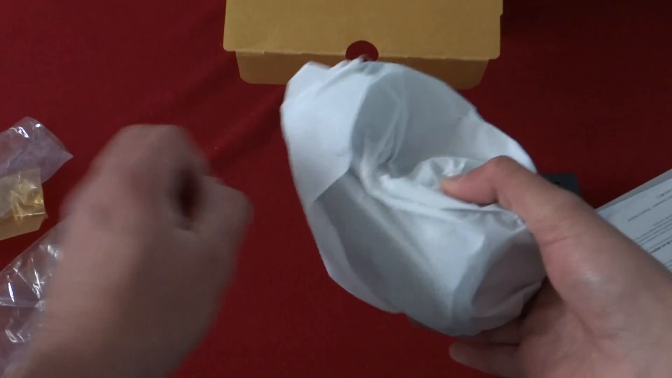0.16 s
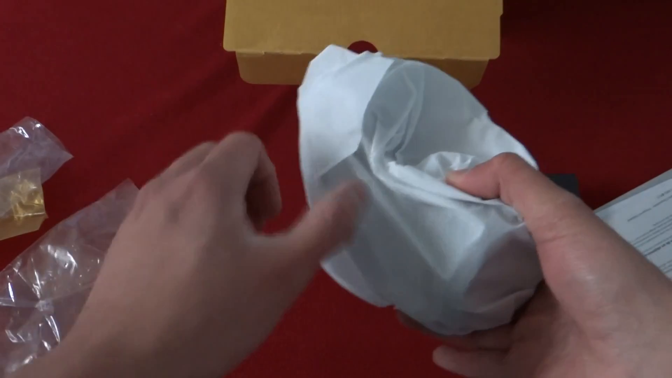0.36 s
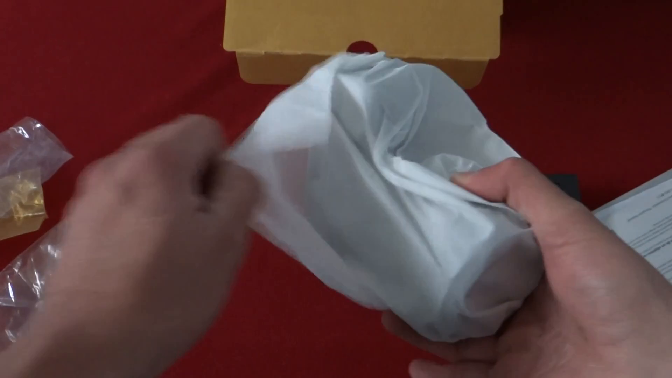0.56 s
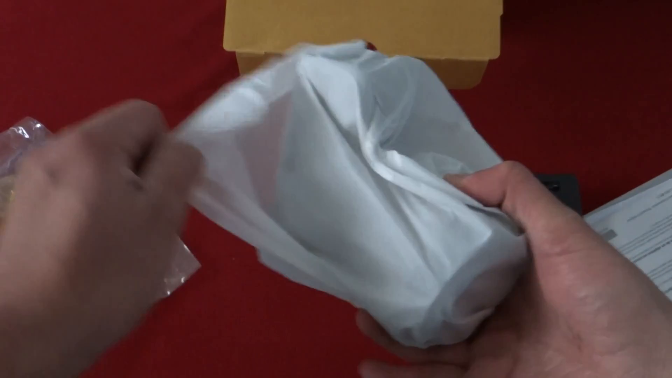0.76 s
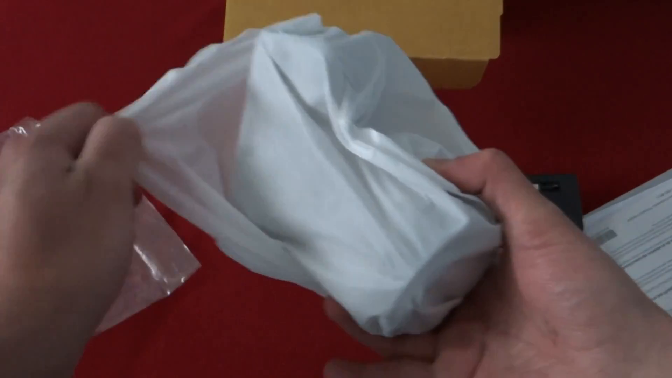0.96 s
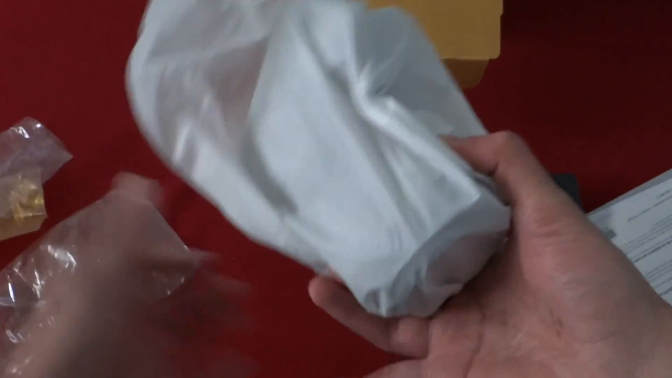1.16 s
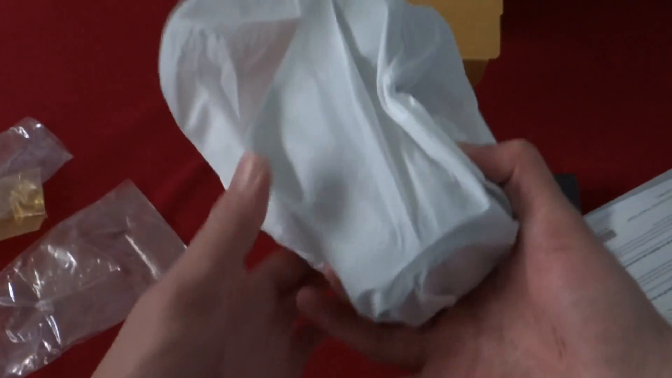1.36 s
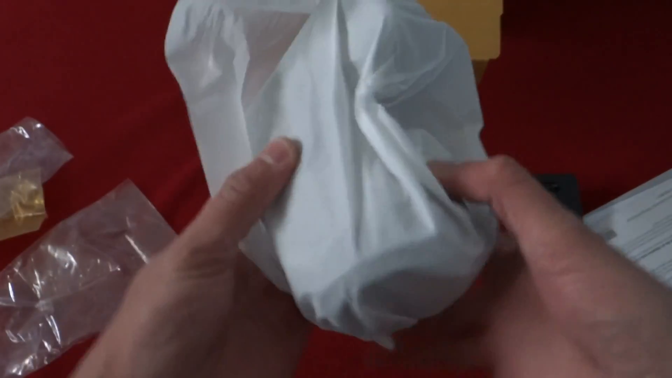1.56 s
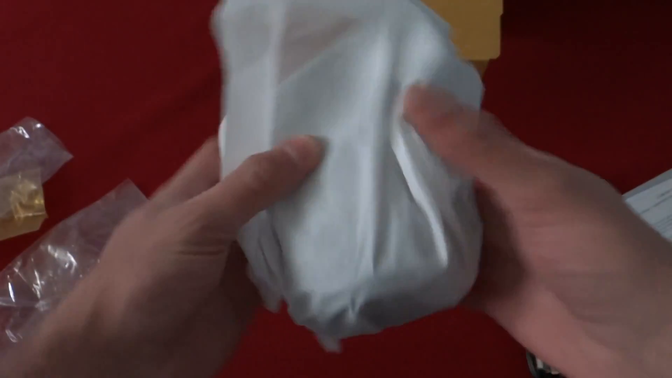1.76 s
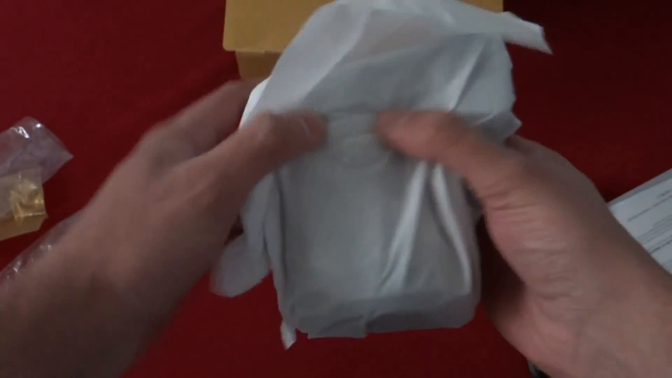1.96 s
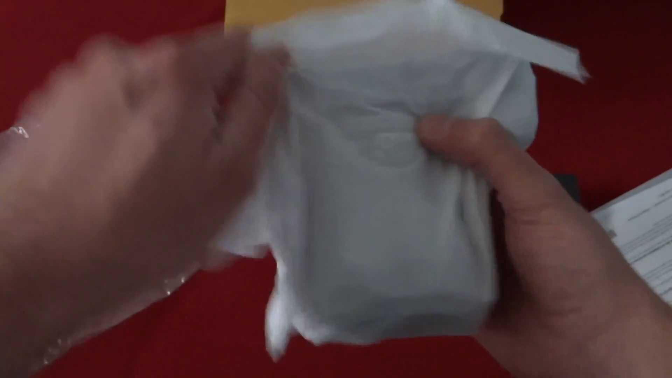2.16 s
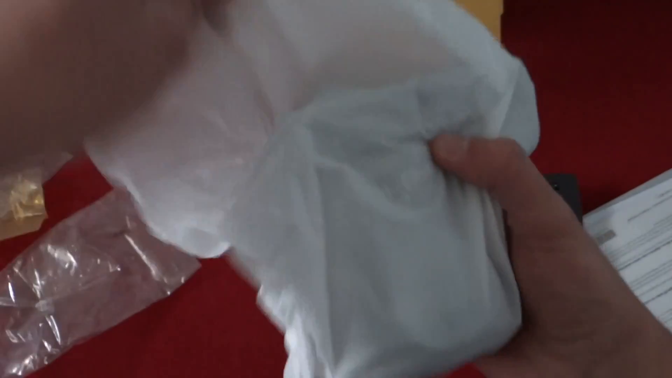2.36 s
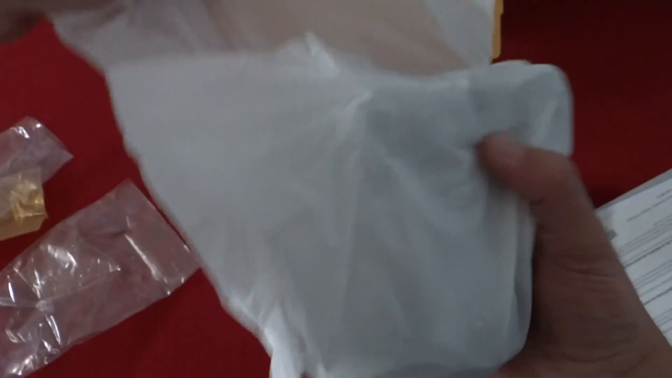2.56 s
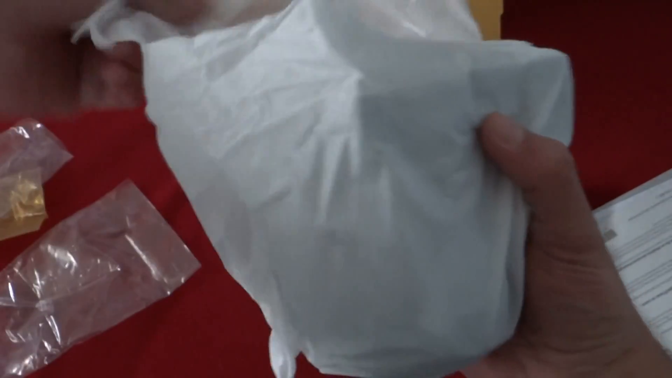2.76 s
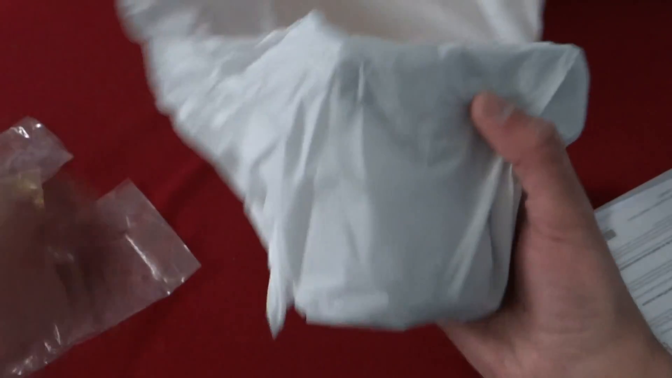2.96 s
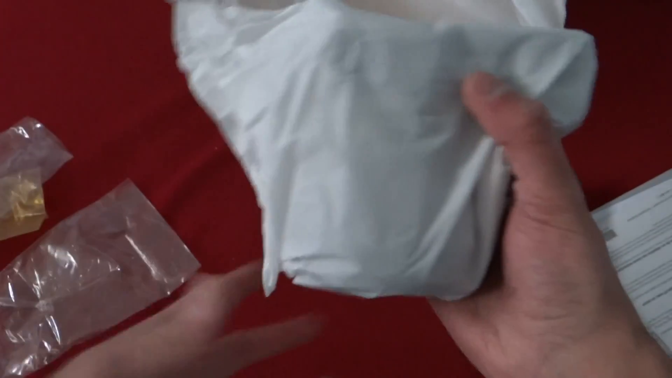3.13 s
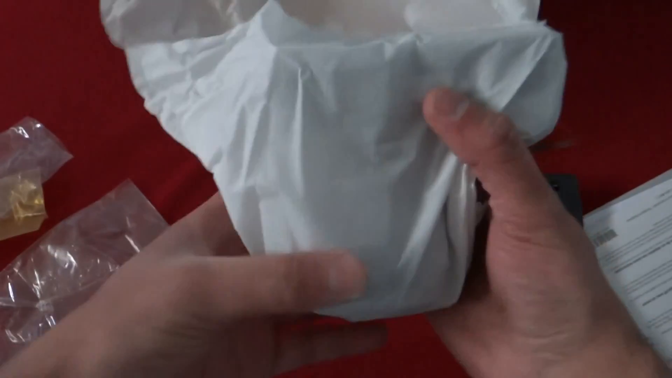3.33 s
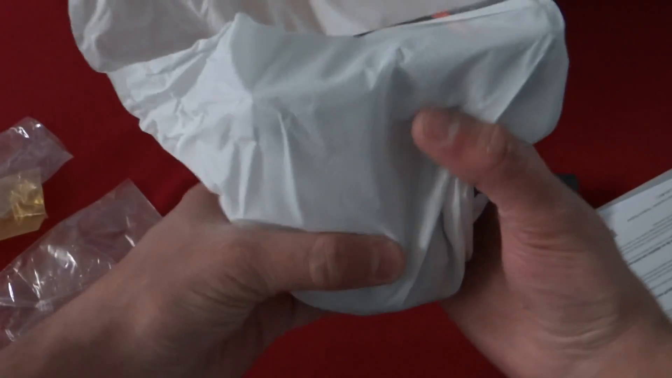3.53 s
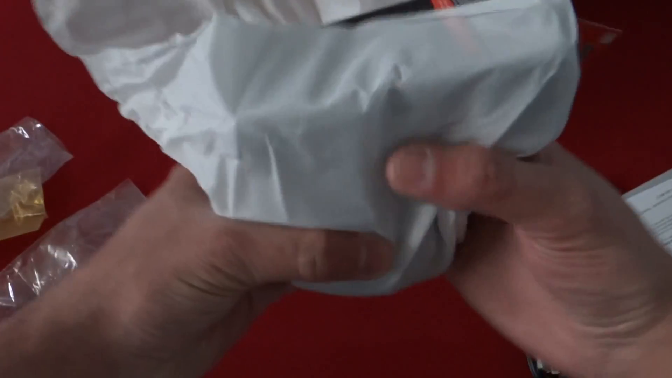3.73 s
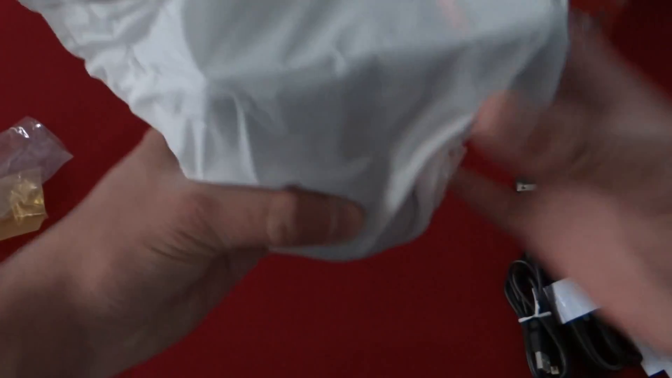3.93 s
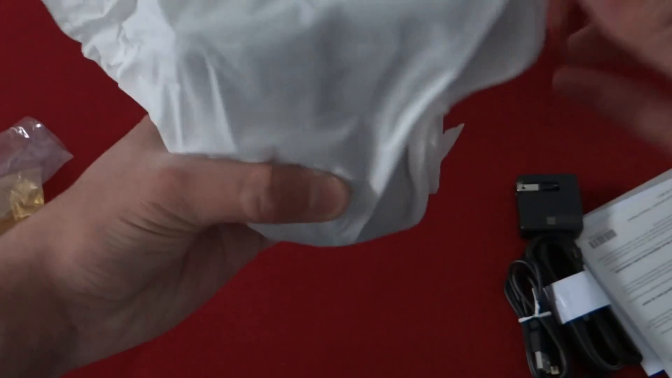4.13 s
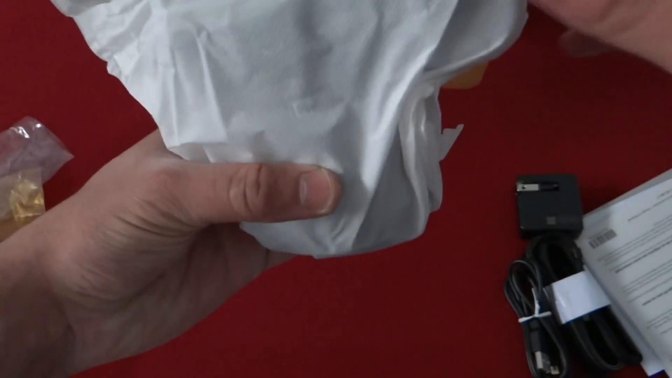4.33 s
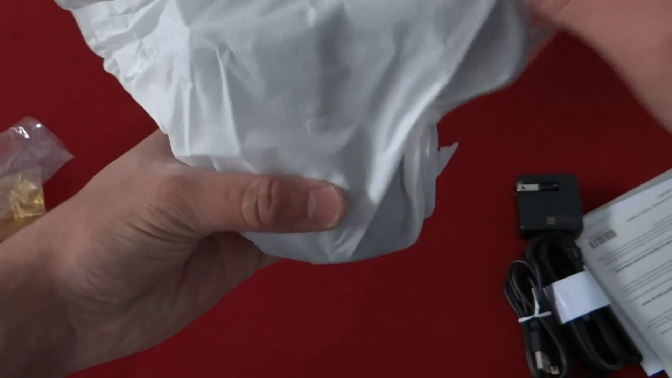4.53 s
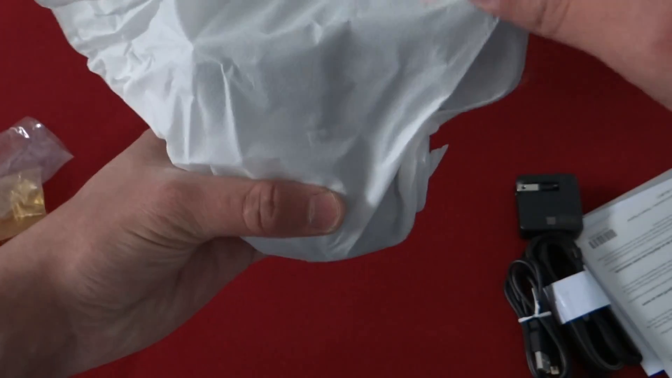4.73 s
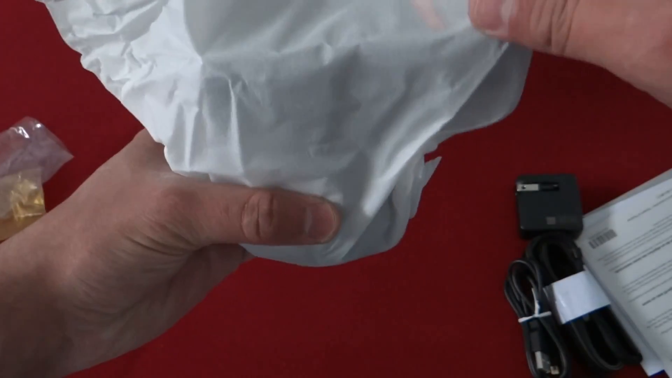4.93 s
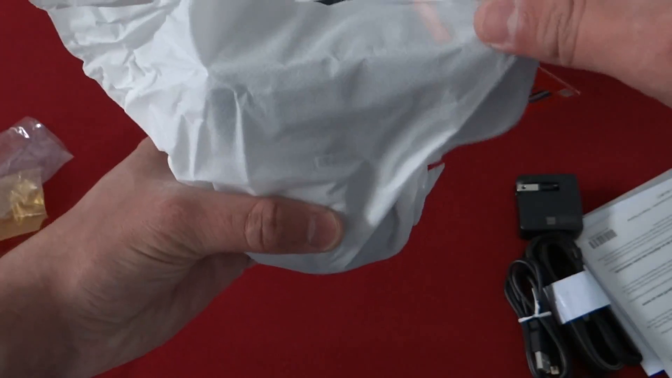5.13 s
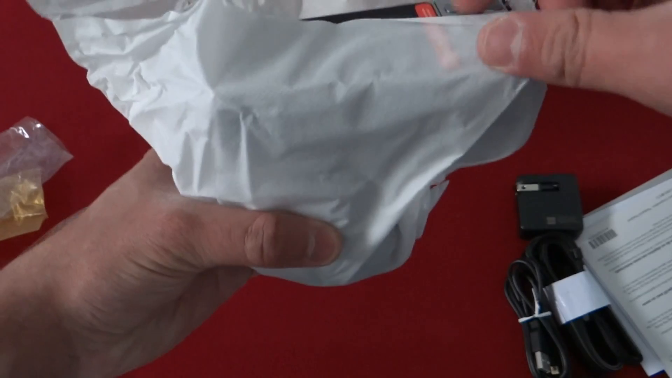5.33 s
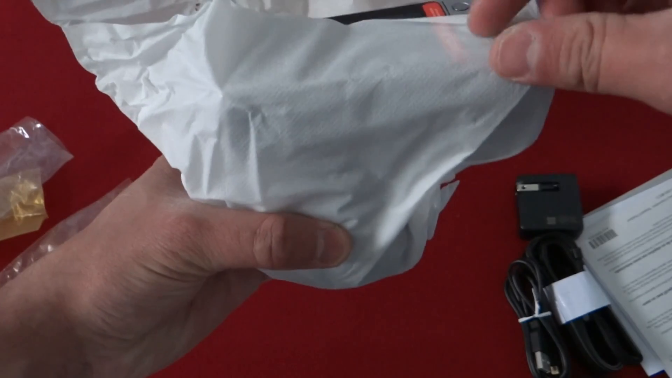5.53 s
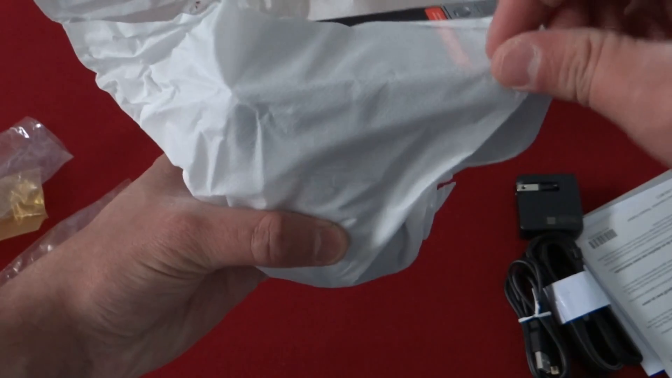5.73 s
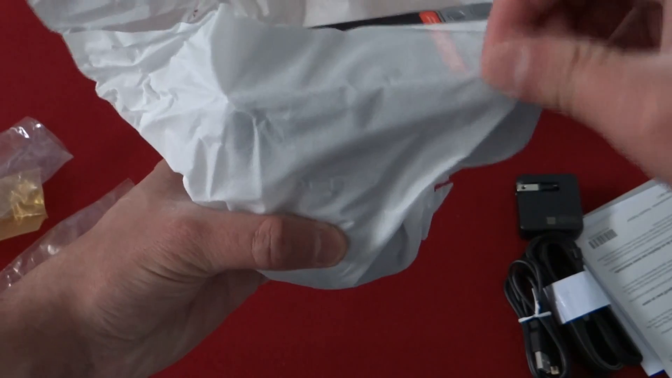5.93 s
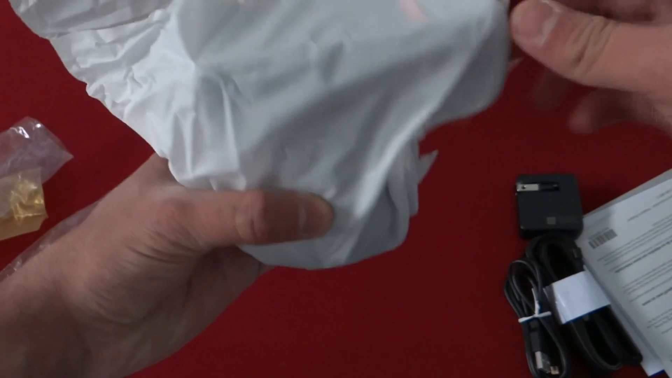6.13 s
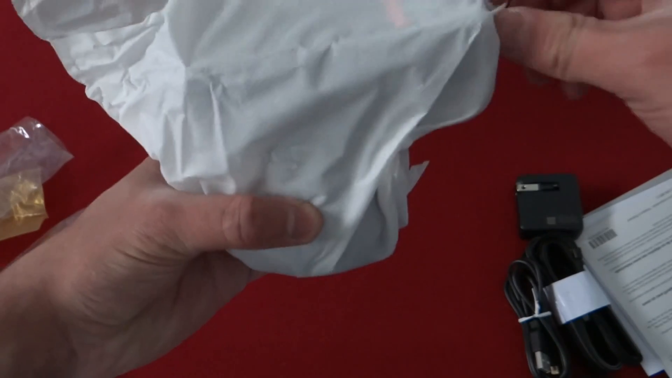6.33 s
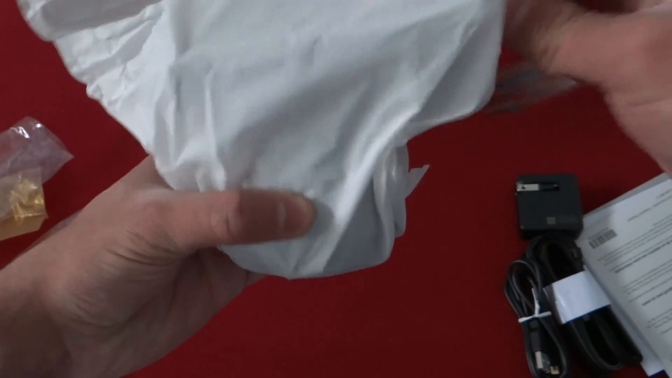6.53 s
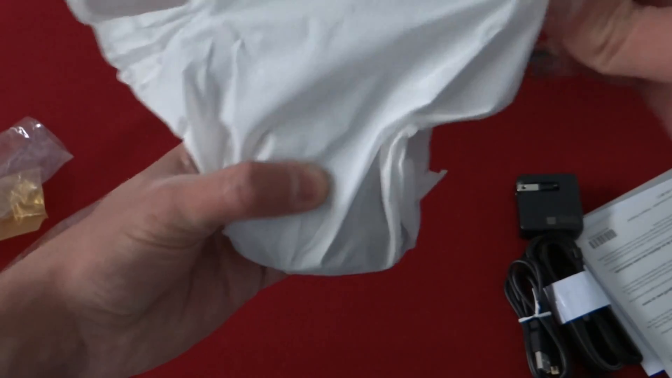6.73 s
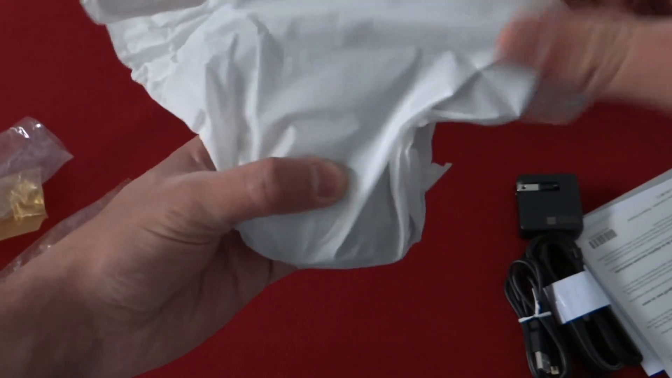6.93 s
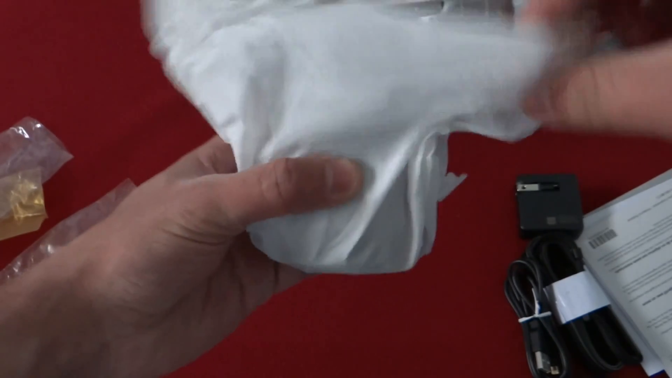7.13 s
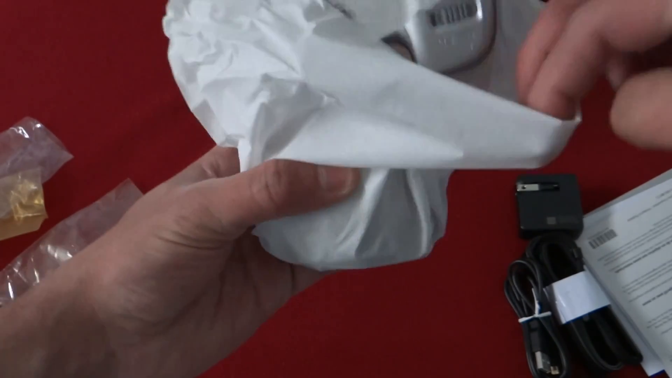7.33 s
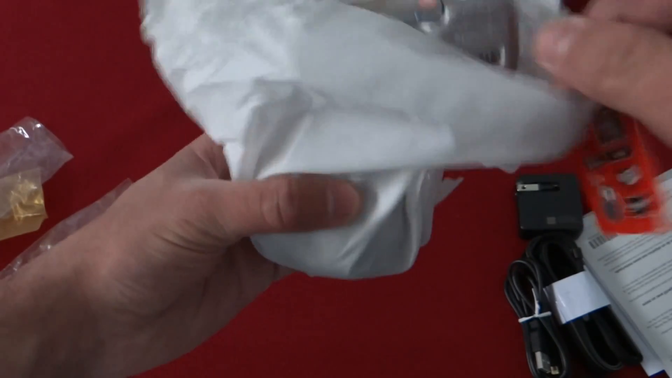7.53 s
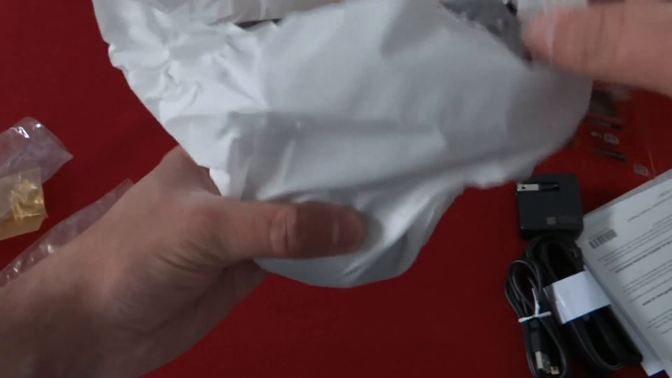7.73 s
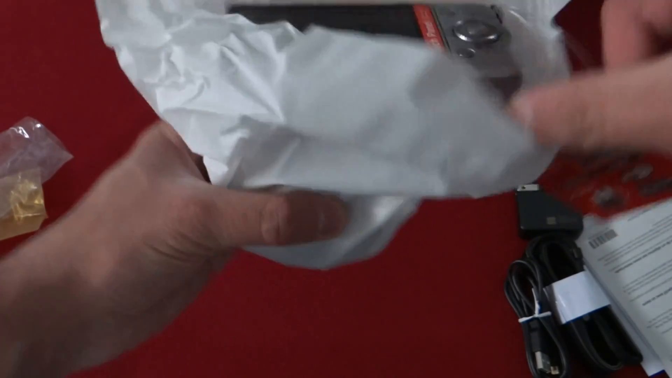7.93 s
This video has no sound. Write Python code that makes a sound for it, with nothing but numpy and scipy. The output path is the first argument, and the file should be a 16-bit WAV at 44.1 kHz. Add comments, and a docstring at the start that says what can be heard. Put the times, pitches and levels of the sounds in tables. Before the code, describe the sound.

Close handling of tissue paper: crackly bursts with sharp snapping folds and soft finger bumps, easing off midway before crinkling loudly again.

```python
"""A quiet furnished room: two hands pull thin wrapping tissue off an object, just under a microphone.
Creases buckle in swarms of tiny clicks over the hiss of sliding paper, and larger folds snap.
The loose sheet flaps low, fingers bump the object and a thumb squeaks twice by stick-slip.
A short reverberation and steady room air lie behind; the microphone housing colours it all."""
import sys
import numpy as np
from scipy import signal
from scipy.io import wavfile
from scipy.ndimage import uniform_filter1d

SR = 44100
rng = np.random.default_rng(int(sys.argv[2]) if len(sys.argv) > 2 else 0)


def wav_record(signal):
    """Record a signal, one row per channel, as 16-bit PCM in the file named by sys.argv[1]."""
    frames = np.transpose(np.atleast_2d(signal))
    bounded = np.clip(frames, -1, 1)
    # unit amplitude maps onto the largest positive 16-bit level
    quanta = np.round(bounded * 32767).astype(np.int16)
    wavfile.write(sys.argv[1], SR, quanta)


N = 356328


def gain_of(db):
    """Decibels to amplitude."""
    return 10 ** (np.asarray(db) / 20)


def unit_rms(x):
    """Scales to rms 1."""
    return x / np.sqrt(np.mean(x ** 2) + 1e-20)


def curve_at(points, hz):
    """Interpolates a curve on a log-frequency axis."""
    freq_hz, value = np.transpose(points)
    return np.interp(np.log(hz + 1), np.log(freq_hz + 1), value)


def coloured(x, spectrum):
    """Minimum-phase filter of unit energy with the given spectrum."""
    gain_db = np.maximum(curve_at(spectrum, np.fft.rfftfreq(8192, 1 / SR)), -100)
    log_gain = np.log(gain_of(gain_db))
    mirrored = np.concatenate([log_gain, log_gain[-2:0:-1]])
    taps = np.fft.ifft(np.exp(np.conj(signal.hilbert(mirrored)))).real[:4096]
    return signal.oaconvolve(x, taps / np.linalg.norm(taps))[:len(x)]


def drift(cutoff_hz):
    """Low-passed noise of rms 1."""
    lowpass = signal.butter(2, cutoff_hz, fs=SR, output="sos")
    smooth = signal.sosfiltfilt(lowpass, rng.standard_normal(N + SR))
    return unit_rms(smooth[SR // 2:][:N])


def tilt(hz, slope_db_oct):
    """Gain that trades middle for treble at constant loudness."""
    slopes = np.linspace(-20, 20, 41)
    octaves = np.log2(np.linspace(1200, 11000, 30) / 5000)
    loudness = np.sqrt(np.mean(gain_of(np.outer(slopes, octaves)) ** 2, 1))
    gain = gain_of(slope_db_oct * np.log2(np.clip(hz, 1200, 15000) / 5000))
    return gain / np.interp(slope_db_oct, slopes, loudness)


def add(mix, start_s, sound):
    """Mixes a sound in at start_s."""
    part = mix[round(start_s * SR):][:len(sound)]
    part += sound[:len(part)]


# Steady rustle of holding and turning the parcel: time_s, level_db, slope_db_oct
GRIP = [(0.0, -44.5, 2), (0.42, -78.5, -4.5), (0.5, -37.5, -4), (1.1, -45, 1.5), (1.3, -60, -3),
        (1.42, -34.5, -3.5), (1.64, -37.5, -3), (1.72, -59, 15), (1.8, -30, -1), (2.11, -39, 0),
        (2.2, -41, -9), (2.8, -35, 3), (3.0, -56.5, -2.5), (3.229, -52.5, -4.5), (3.3, -36, -5),
        (3.9, -39, -2), (4.0, -53.5, -2), (4.45, -60.5, 1), (4.7, -66, -6), (5.14, -58, 3.5),
        (5.2, -50.5, -3), (5.85, -53.5, 1), (6.45, -45.5, -2), (6.55, -37, -2.5), (7.8, -36.5, -1),
        (7.9, -48, 4), (8.08, -36, -1)]
# Tugs that crumple the tissue: start_s, hold_s, level_db, slope_db_oct, flap_offset_db
TUGS = [(0.0, 0.037, -36, 2.5, -17.5), (0.339, 0.013, -50, -2.5, -10), (0.442, 0.034, -32.5, 0, -16.5),
        (0.578, 0.039, -28, -2, -14), (0.667, 0.0077, -39, -2, -8), (0.746, 0.021, -34.5, -3, -21),
        (0.79, 0.07, -36, -3, -16), (0.88, 0.008, -41.5, -5, -10), (0.988, 0.032, -33.5, -0.5, -13),
        (1.072, 0.013, -39, -2, -9), (1.179, 0.029, -49, -2, -5.5), (1.373, 0.038, -35, -3, -10.5),
        (1.64, 0.0098, -36, -4, -25), (1.734, 0.015, -35.5, -5.5, -13.5), (1.775, 0.011, -30, -5, -23),
        (1.816, 0.0043, -28, -7.5, -18), (1.889, 0.042, -32.5, -2, -11.5), (1.992, 0.044, -32.5, -3, -10),
        (2.132, 0.037, -26, 0, -18.5), (2.207, 0.014, -30, 1, -11), (2.253, 0.092, -28, -3, -15),
        (2.334, 0.073, -29, -4.5, -6), (2.402, 0.1, -31.5, -3, -14), (2.491, 0.012, -31.5, -6, -4.5),
        (2.572, 0.028, -32, -10, -7), (2.637, 0.014, -28, -5.5, -16), (2.799, 0.02, -26.5, 2.5, -12.5),
        (2.862, 0.036, -39, -5.5, -2.5), (3.112, .035, -48, -4, -35), (3.261, 0.1, -38.5, -2, -5.5),
        (3.446, 0.11, -32, -4, -14.5), (3.694, 0.015, -34, -6.5, -12), (3.79, 0.028, -39, -3, -19),
        (3.96, 0.013, -46.5, -2, -13), (4.027, 0.043, -44.5, -2, -11), (4.286, 0.064, -48, -1.5, -8.5),
        (4.718, 0.08, -61.5, 4, -25), (4.887, 0.023, -57, 7, -26), (5.163, 0.0053, -44.5, 8, -19),
        (5.254, 0.029, -43.5, 4.5, -12), (5.351, 0.084, -48.5, 3, -9), (5.478, 0.006, -34, 7.5, -14.5),
        (5.613, 0.0053, -40.5, 6, -6.5), (5.739, 0.039, -48, -4, -0.5), (5.985, 0.046, -51, 10, -13),
        (6.095, 0.013, -38.5, 6, -15), (6.202, 0.014, -49, 7, -17), (6.288, 0.018, -41.5, -1, -16),
        (6.385, 0.015, -35.5, 1.5, -26), (6.503, 0.059, -32.5, 0.5, -13), (6.551, 0.061, -30.5, -2, -9.5),
        (6.638, 0.016, -35.5, -4, -8), (6.706, 0.021, -30.5, 1, -13), (6.851, 0.028, -26, -2.5, -17),
        (7.014, 0.015, -28, -0.5, -16), (7.09, 0.042, -27.5, 1, -15), (7.146, 0.053, -25.5, -0.5, -10),
        (7.223, 0.037, -30.5, 0, -12.5), (7.394, 0.031, -28, -1.5, -12.5), (7.446, 0.02, -27.5, 0, -21),
        (7.523, 0.022, -34, -2, -16), (7.568, 0.015, -31.5, -1, -5.5), (7.734, 0.097, -39, 0.5, -37),
        (7.934, 0.062, -40.5, -2.5, -27), (8.029, .05, -35, 0.5, -34)]


def pull(rise_s=0.013, fall_db_per_s=325, grip_flap_db=-14.5):
    """Tugs rise fast, hold and die away over the grip; returns effort, spectral slope and flap gain."""
    time_s, *columns = np.transpose(GRIP)
    grip_db, grip_slope = (np.interp(np.arange(N) / SR, time_s, column) for column in columns)
    power = gain_of(grip_db) ** 2
    weighted_slope = power * grip_slope
    flap_power = power * gain_of(grip_flap_db) ** 2
    t = np.arange(SR // 2) / SR
    for start_s, hold_s, level_db, slope_db_oct, flap_offset_db in TUGS:
        fall_db = fall_db_per_s * np.maximum(t - rise_s - hold_s, 0)
        tug_power = (np.minimum(t / rise_s, 1) * gain_of(level_db - fall_db)) ** 2
        add(power, start_s, tug_power)
        add(weighted_slope, start_s, tug_power * slope_db_oct)
        add(flap_power, start_s, tug_power * gain_of(flap_offset_db) ** 2)
    return np.sqrt(power), weighted_slope / power, np.sqrt(flap_power)


def buckle(noise, ring_hz, ring_cycles, decay_ms, burst_gain, edge):
    """A crease gives way: a sharp edge and a short burst, partly rung by the paper around it."""
    t = np.arange(len(noise)) / SR
    burst = noise * np.sqrt(t) * np.exp(-1000 * t / decay_ms)
    burst[0] = edge * np.linalg.norm(burst)
    ring = np.exp(-t * ring_hz / ring_cycles) * np.sin(2 * np.pi * ring_hz * t)
    return unit_rms(np.convolve(burst, ring)[:len(t)]) + burst_gain * unit_rms(burst)


# Spectrum of the tissue: freq_hz, gain_db
TISSUE_SPECTRUM = [(300, -22), (550, -16), (970, -5), (1300, -4.5), (1800, 2.5), (4000, -3), (9000, 7.5),
                   (10600, 0.5), (11300, -6), (13500, -6.5), (16000, -14)]


def crinkle(effort, slope_db_oct, patches=20, clicks_per_s=1600, spread_db=4.5, clump_db=1.1):
    """Creases buckle in swarms over the sliding hiss; each patch of paper has its own pitch and pan."""
    size = gain_of(spread_db * np.minimum(rng.exponential(1, N), 2.7))
    size *= rng.random(N) < clicks_per_s / SR
    patch_of = rng.integers(0, patches, N)
    clicks = np.zeros((2, N))
    for patch, ring_hz in enumerate(np.geomspace(700, 15000, patches)):
        noise = rng.standard_normal(200)
        click = buckle(noise, ring_hz, ring_cycles=.9, decay_ms=.4, burst_gain=.22, edge=.45)
        at = np.flatnonzero(size * (patch_of == patch))
        train = np.zeros(N)
        train[at] = size[at] * np.sqrt(ring_hz) * tilt(ring_hz, slope_db_oct[at])
        pan_db = 1.4 * rng.uniform(-0.84, 1)
        clicks += signal.oaconvolve(train, click)[:N] * gain_of([[pan_db], [-pan_db]])
    texture = unit_rms(clicks) + slide(slope_db_oct)
    clumped = unit_rms(texture * gain_of(clump_db * drift(cutoff_hz=28)))
    return np.array([coloured(channel, TISSUE_SPECTRUM) for channel in clumped * effort])


def slide(slope_db_oct, patchy_db=2.2, shifting_db=2.5, stereo_power=.025):
    """Paper slides on paper: a patchy hiss whose colour shifts as the folds change."""
    frames = N // 64 + 5
    hz = np.fft.rfftfreq(256, 1 / SR)[:, None]
    noise = rng.standard_normal((frames, len(hz), 6), dtype=np.float32)
    mid_re, mid_im, side_re, side_im, patches, shifts = noise.T
    patches = unit_rms(uniform_filter1d(uniform_filter1d(patches, 8, axis=0), 14, axis=1))
    shifts = unit_rms(uniform_filter1d(uniform_filter1d(shifts, 8, axis=0), 100, axis=1))
    colour = tilt(hz, slope_db_oct[np.minimum(np.arange(frames) * 64, N - 1)])
    colour *= gain_of(patchy_db * patches + shifting_db * shifts)
    width = np.sqrt(stereo_power) * np.clip((14000 - hz) / 4000, .45, 1)  # narrower in the treble
    mid = mid_re + 1j * mid_im
    side = width * (side_re + 1j * side_im)
    _, hiss = signal.istft(np.array([mid + side, mid - side]) * colour, nperseg=256, noverlap=192)
    return unit_rms(hiss[:, :N])


# Snapping folds: start_s, level_db, ring_hz
SNAPS = [(0.297, -40, 3500), (0.3514, -43, 6080), (0.4514, -46, 7460), (0.4645, -19.5, 3000),
         (0.581, -12, 2490), (0.586, -21, 3000), (0.593, -22, 3000), (0.597, -18, 3530), (0.627, -10, 2900),
         (0.6972, -16.5, 2650), (0.76, -11.5, 4170), (0.769, -20, 3460), (0.7945, -14.5, 3680),
         (0.808, -15, 7900), (0.8508, -16, 1900), (0.863, -19.5, 6000), (0.8928, -14, 3040),
         (0.8985, -16.5, 3000), (1.013, -29, 2860), (1.0936, -23, 2410), (1.1297, -21, 6660),
         (1.193, -22.5, 2600), (1.379, -33, 3000), (1.3969, -15.5, 3270), (1.4917, -19, 3120),
         (1.642, -23, 2730), (1.739, -16.5, 3800), (1.7628, -16.5, 2760), (1.7918, -11.5, 2610),
         (1.809, -17.5, 2630), (1.825, -19, 2300), (1.83, -12, 2500), (1.837, -9, 2580), (1.935, -13, 2800),
         (1.9811, -14, 4500), (2.1446, -23, 8650), (2.2244, -8.5, 2960), (2.275, -7.5, 2780),
         (2.325, -7.5, 6500), (2.356, -14, 6500), (2.362, -11, 6500), (2.387, -13, 7400),
         (2.4092, -4.5, 5000), (2.439, -12, 4500), (2.5056, -10, 3870), (2.5093, -7.5, 2220),
         (2.5565, -17.5, 8050), (2.597, -10, 3000), (2.621, -14, 9500), (2.6523, -4.5, 5330),
         (2.6725, -9, 6200), (2.683, -10, 8650), (2.728, -24, 8900), (2.879, -18.5, 8800),
         (2.8973, -21, 6130), (2.921, -22, 3000), (2.933, -34, 3000), (2.9594, -22.5, 3970),
         (3.067, -29, 1650), (3.107, -24, 2930), (3.119, -49, 2670), (3.13, -26, 2820), (3.1356, -22, 2850),
         (3.2525, -29, 9130), (3.273, -19.5, 3760), (3.5104, -20, 2600), (3.5603, -15.5, 4030),
         (3.7995, -14.5, 8000), (3.8232, -18.5, 2450), (3.9697, -25.5, 1700), (4.0374, -23.5, 9400),
         (4.3015, -25.5, 7800), (4.716, -26.5, 4880), (4.9246, -36, 5000), (5.012, -35, 3800),
         (5.0538, -27.5, 4470), (5.114, -34, 3720), (5.1767, -29, 8850), (5.214, -26, 1700),
         (5.266, -34, 7200), (5.292, -37, 8750), (5.328, -28, 8300), (5.4964, -27, 9900),
         (5.622, -34, 8390), (5.6295, -17, 10000), (5.7627, -13.5, 6000), (5.803, -29, 3500),
         (5.931, -39, 7340), (5.9868, -42, 8950), (6.106, -41, 9600), (6.1322, -22, 8800),
         (6.219, -26, 8540), (6.391, -31, 9290), (6.4115, -16.5, 9700), (6.458, -21.5, 3660),
         (6.569, -16, 6000), (6.589, -14, 3570), (6.613, -19, 3000), (6.6486, -7, 3000),
         (6.653, -7.5, 4700), (6.7123, -23, 3210), (6.7262, -13.5, 9300), (6.733, -19, 8000),
         (6.8145, -13.5, 3700), (6.8446, -16, 3780), (6.87, -9, 3700), (6.933, -12, 3840),
         (6.9684, -13, 4950), (6.995, -18, 3800), (7.0288, -11.5, 4050), (7.0992, -22, 9800),
         (7.1385, -6, 5040), (7.164, -0.5, 3800), (7.1827, -8, 6400), (7.209, -10.5, 2030),
         (7.2275, -12, 8900), (7.2328, -11, 8950), (7.264, -14, 8250), (7.311, -18, 4680),
         (7.387, -28, 9680), (7.4012, -21, 2980), (7.472, -10.5, 8150), (7.474, -10, 8650),
         (7.527, -8, 1340), (7.5765, -12.5, 3800), (7.83, -24, 7760), (7.9633, -12.5, 3800)]


def snaps(dull_below_hz=5000, crack_delay_s=.0007, tail_db=-17, tail_s=.005, push_db=-30, push_s=.0047):
    """Larger folds pop: a crack coloured by the fold, a crackling tail and a low push of the sheet."""
    cracks, pushes = np.zeros((2, N))
    t = np.arange(900) / SR
    push_envelope = np.sin(np.pi * t / t[-1]) * np.exp(-t / push_s)
    noises = rng.standard_normal((len(SNAPS), 3, len(t)))
    for (start_s, level_db, ring_hz), (noise, puff, rattle) in zip(SNAPS, noises):
        burst_gain = 1.9 * min(ring_hz / dull_below_hz, 1)
        crack = buckle(noise, ring_hz, ring_cycles=.7, decay_ms=.45, burst_gain=burst_gain, edge=.8)
        highpass = signal.butter(1, ring_hz / 3, "high", fs=SR)  # small folds move little air
        crack = signal.lfilter(*highpass, crack)
        crack *= 2 / np.linalg.norm(crack)
        crackle = unit_rms(np.convolve(rattle ** 3, crack[:60])[:len(t)])
        tail = crackle * np.exp(-t / tail_s) / 2
        add(cracks, start_s + crack_delay_s, gain_of(level_db) * (crack + gain_of(tail_db) * tail))
        add(pushes, start_s, gain_of(level_db) * puff * push_envelope)
    return coloured(cracks, TISSUE_SPECTRUM) + gain_of(push_db) * coloured(pushes, FLAP_SPECTRUM)


# Spectrum of air pushed by the sheet: freq_hz, gain_db
FLAP_SPECTRUM = [(20, -37), (40, -19.5), (95, -5.5), (190, -3), (290, 2), (370, 2), (510, 0), (650, -7),
                 (1000, -2.5), (2000, -60.5)]


def flap(gain, lumpy_db=2.2):
    """The loose sheet pushes air in soft low lumps."""
    lumps = gain_of(lumpy_db * drift(cutoff_hz=15.6)) * rng.standard_normal(N)
    return unit_rms(coloured(lumps, FLAP_SPECTRUM)) * gain


# Finger bumps: start_s, level_db, pitch_hz
BUMPS = [(0.594, -25.5, 463), (0.891, -33, 380), (1.088, -36.5, 350), (1.394, -28.5, 400),
         (1.784, -34, 427), (1.876, -35.5, 368), (2.183, -31.5, 363), (2.262, -37, 286), (2.504, -40, 95),
         (2.661, -29, 340), (2.668, -40, 80), (2.73, -35, 357), (2.895, -31, 476), (3.161, -37, 530),
         (3.288, -45, 91), (3.923, -35.5, 256), (6.771, -33.5, 333), (6.934, -33, 382), (6.58, -41, 95),
         (7.134, -30, 402), (7.38, -33, 367), (7.43, -31.5, 440), (7.479, -42, 90), (7.576, -34, 264)]


def finger_bumps(rise_cycles=.75, puff_gain=.3, puff_ref_hz=398, delay_s=.00204):
    """Fingers knock the wrapped object: a few low cycles and a puff, softer for deeper bumps."""
    out = np.zeros(N)
    t = np.arange(2000) / SR
    puffs = signal.lfilter(*signal.butter(2, 1500, fs=SR), rng.standard_normal((len(BUMPS), len(t))))
    for (start_s, level_db, pitch_hz), puff in zip(BUMPS, puffs):
        age = t * pitch_hz / rise_cycles
        envelope = age * np.exp(1 - age)
        body = np.sin(2 * np.pi * pitch_hz * t) + puff_gain * pitch_hz / puff_ref_hz * unit_rms(puff)
        add(out, start_s + delay_s, gain_of(level_db) * envelope * body)
    return out


# Thumb glides, one list a squeak: time_s, pitch_hz, level_db
SQUEAK_GLIDES = [
    [(2.078, 9000, -47), (2.105, 10230, -39), (2.16, 10150, -39), (2.21, 10680, -40), (2.255, 10150, -41),
     (2.3, 10100, -42), (2.33, 9400, -50)],
    [(2.515, 9400, -52), (2.54, 10000, -42), (2.58, 10300, -41), (2.63, 10550, -40), (2.685, 10480, -42),
     (2.705, 10020, -44), (2.785, 9900, -45)],
]
# Partials, one list a squeak: pitch_ratio, gain_db
SQUEAK_PARTIALS = [
    [(0.875, -8), (1.0, 0), (1.115, -14)],
    [(0.9, -8), (1.0, 0), (1.17, -10), (1.29, -20)],
]


def thumb_squeaks(pitch_jitter=.005, flutter_db=2.8, patchy_db=2.4):
    """Skin sticks and slips on taut paper: thin, unsteady partials that follow the thumb's speed."""
    out = np.zeros(N)
    waver, patchy = drift(cutoff_hz=424), drift(cutoff_hz=24.4)
    for glide, partials in zip(SQUEAK_GLIDES, SQUEAK_PARTIALS):
        time_s, pitch_hz, level_db = np.transpose(glide)
        t = np.arange(time_s[0], time_s[-1], 1 / SR)
        glide_hz = uniform_filter1d(np.interp(t, time_s, pitch_hz), 400)
        phase = 2 * np.pi * np.cumsum(glide_hz * (1 + pitch_jitter * waver[:len(t)])) / SR
        tone = sum(gain_of(gain_db) * np.sin(ratio * phase) for ratio, gain_db in partials)
        unsteady_db = flutter_db * waver[-len(t):] + patchy_db * patchy[round(time_s[0] * SR):][:len(t)]
        add(out, time_s[0], gain_of(np.interp(t, time_s, level_db) + unsteady_db) * tone)
    return out


# Reverberation time: freq_hz, t60_s
ROOM_DECAY = [(200, 0.15), (800, 1), (2500, 0.36), (8000, 0.16)]
# Stereo width of the reflections: freq_hz, side_gain_db
ROOM_WIDTH = [(70, -22), (200, -8), (700, -11), (8000, -9), (12000, -42)]


def room(x):
    """Sparse reflections of random sign; each band dies at its own rate, the bass nearly mono."""
    length, spacing = SR // 2, 20
    jitter = rng.integers(0, spacing, (2, (length - 101) // spacing))
    arrivals = np.arange(100, length - spacing, spacing) + jitter
    taps = np.zeros((2, length))
    np.put_along_axis(taps, arrivals, rng.choice([-1., 1.], arrivals.shape), 1)
    hz, t, (mid, side) = signal.stft(taps, SR, nperseg=128)
    side *= gain_of(curve_at(ROOM_WIDTH, hz))[:, None]
    decay = gain_of(-60 * t / curve_at(ROOM_DECAY, hz)[:, None])
    _, tail = signal.istft(np.array([mid + side, mid - side]) * decay, SR, nperseg=128)
    return signal.fftconvolve(x[None], tail / np.linalg.norm(tail[0]), axes=1)[:, :N]


# Spectrum of the room air: freq_hz, gain_db
AIR_SPECTRUM = [(15, -48), (25, -5.5), (97, 5.5), (354, 2.5), (887, -10), (1190, -2.5), (1370, -12),
                (5430, -28), (9070, -10), (16000, -31)]


def room_air(level_db=-62.5, width=.08):
    """The steady air of the room, nearly alike in both channels."""
    mid, side = (coloured(noise, AIR_SPECTRUM) for noise in rng.standard_normal((2, N)))
    return gain_of(level_db) * np.array([mid + width * side, mid - width * side])


def scene():
    """Paper and finger sounds with their reflections, slightly to the right, over the room air."""
    effort, slope_db_oct, flap_gain = pull()
    impacts = snaps() + finger_bumps()
    rustle = gain_of(-1.5) * crinkle(effort, slope_db_oct) + flap(flap_gain) + thumb_squeaks()
    reverb = gain_of(-12) * room(impacts) + gain_of(-11.5) * room(rustle.mean(0))
    return (rustle + impacts + reverb) * gain_of([[-.2], [.2]]) + room_air()


# Microphone housing resonances: centre_hz, width_hz, gain_db
HOUSING_RESONANCES = [(1800, 44, 1.5), (3000, 590, 4.5), (3800, 634, 7), (4880, 720, 5.5), (6150, 200, 6),
                      (7660, 330, 4), (9700, 270, -2)]


def record(dry, cutoff_hz=15700):
    """The microphone housing colours the sound; a steep low-pass limits the band."""
    hz = np.geomspace(500, 20000, 400)
    housing_db = sum(gain_db * 0.5 ** ((2 * (hz - centre_hz) / width_hz) ** 2)
                     for centre_hz, width_hz, gain_db in HOUSING_RESONANCES)
    heard = np.array([coloured(channel, np.transpose([hz, housing_db])) for channel in dry])
    lowpass = signal.firwin(511, cutoff_hz, window=("kaiser", 10), fs=SR)
    return signal.oaconvolve(heard, lowpass[None], "same")


dry = scene()
out = record(dry)
wav_record(out)
```